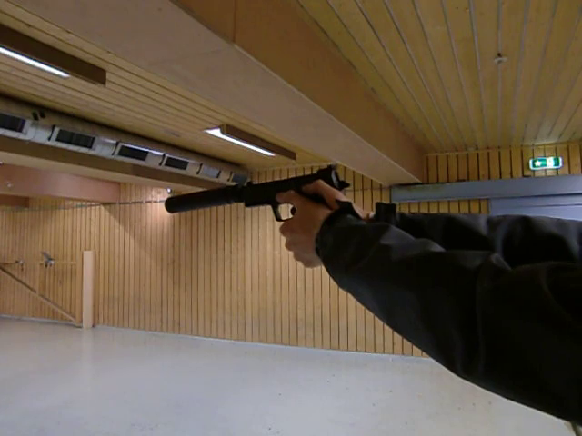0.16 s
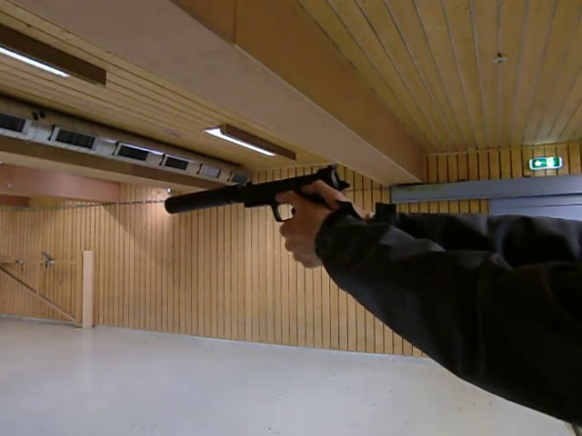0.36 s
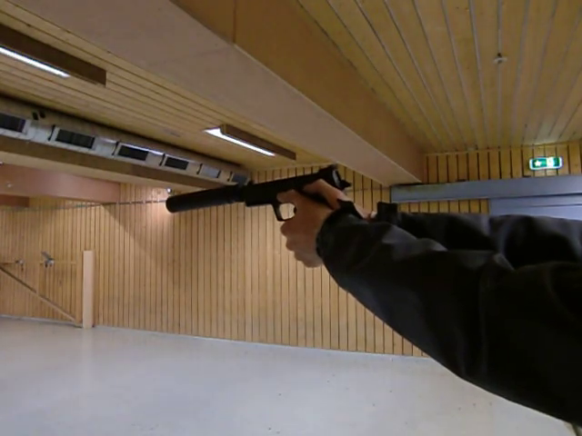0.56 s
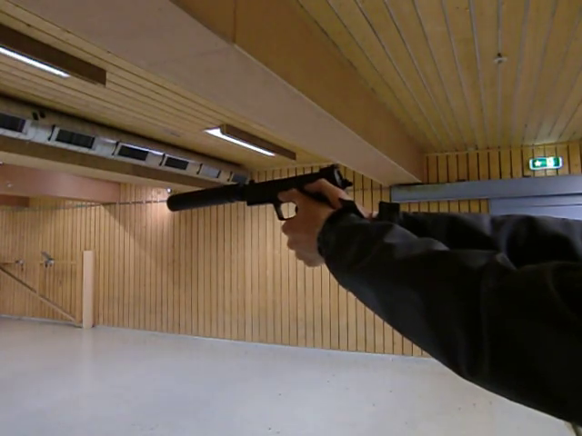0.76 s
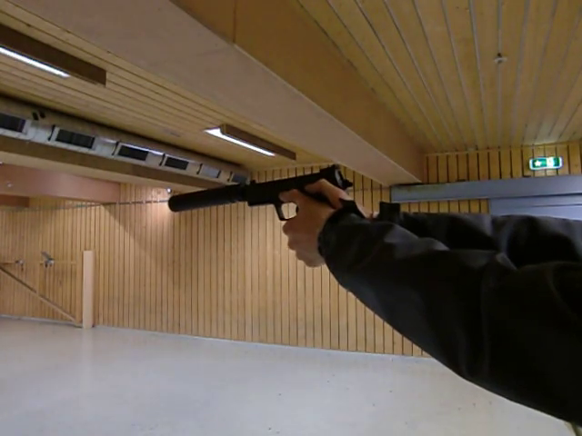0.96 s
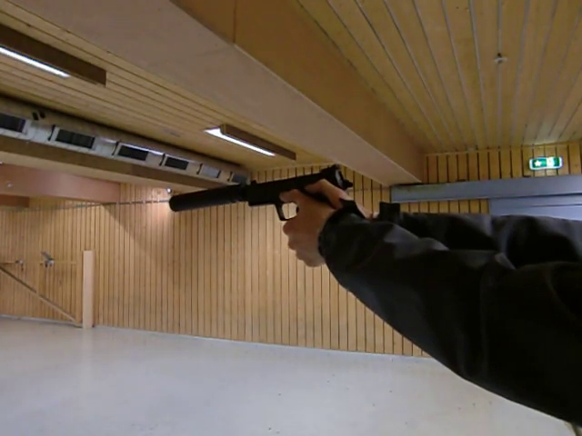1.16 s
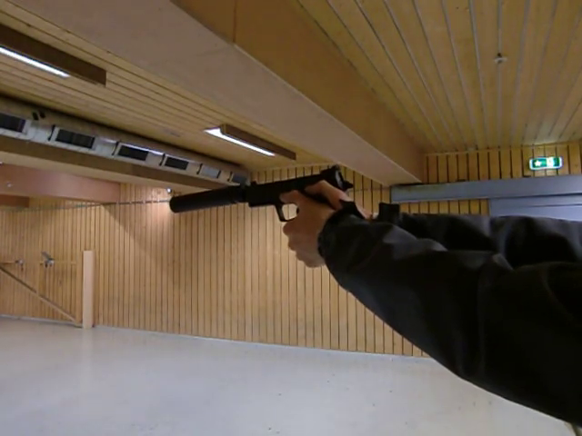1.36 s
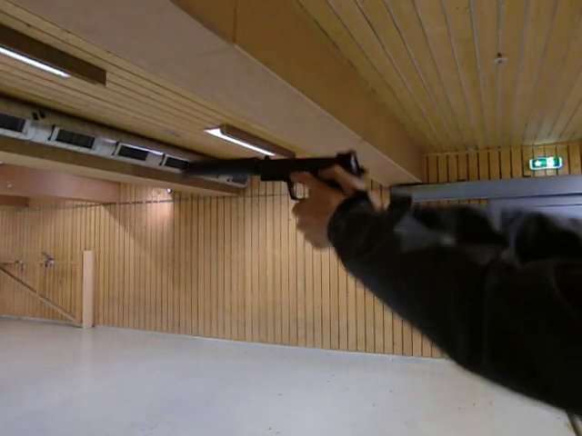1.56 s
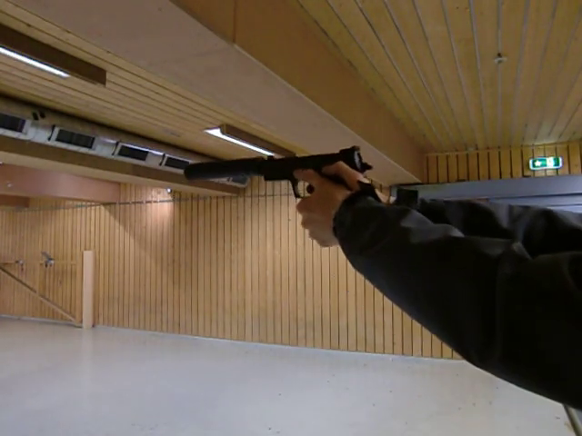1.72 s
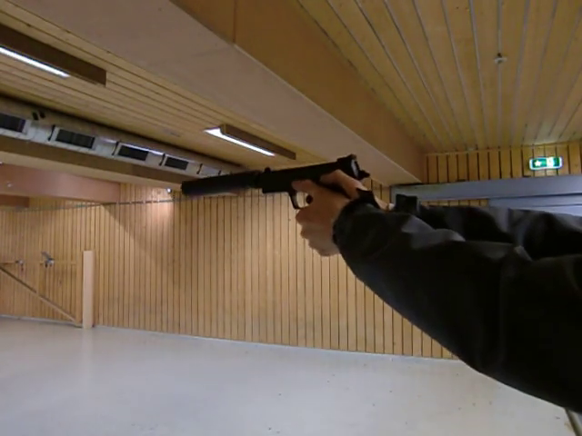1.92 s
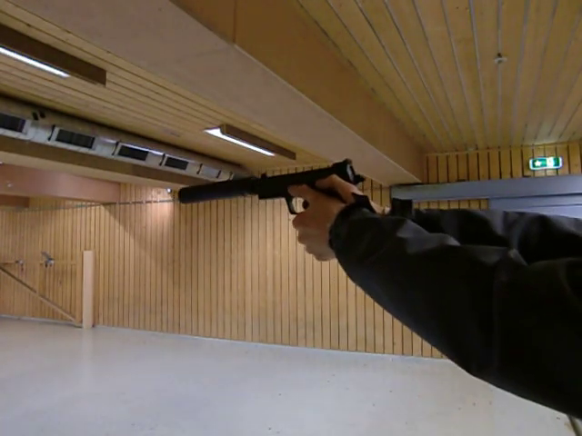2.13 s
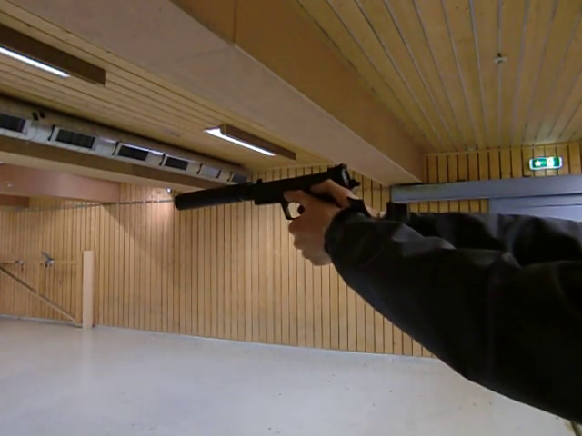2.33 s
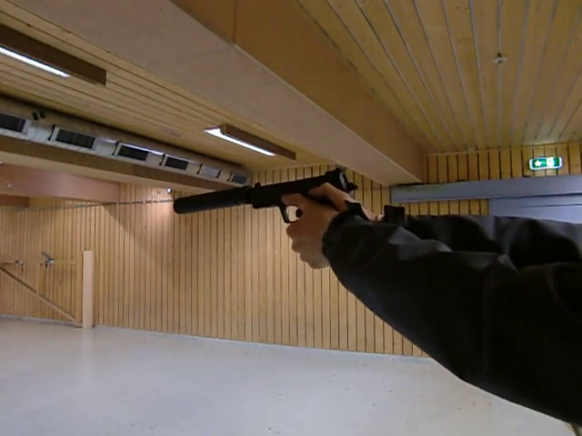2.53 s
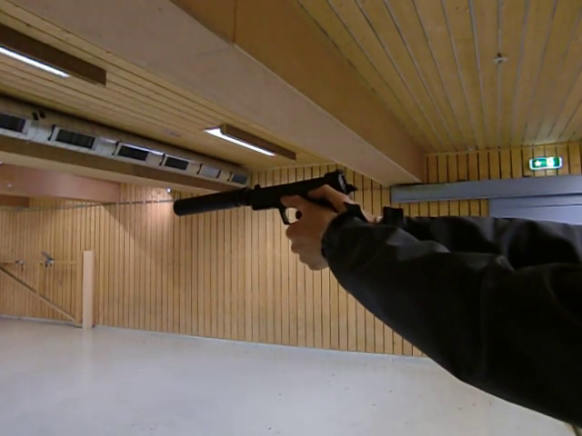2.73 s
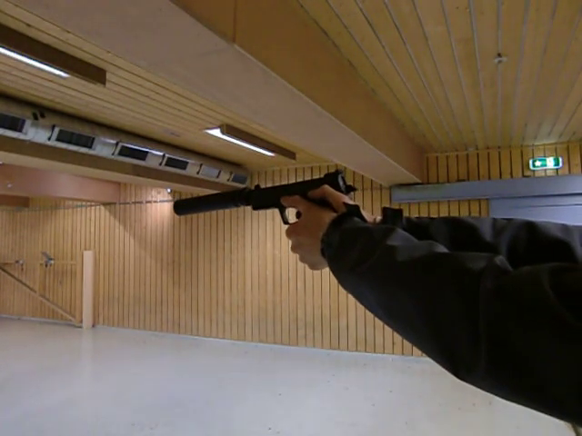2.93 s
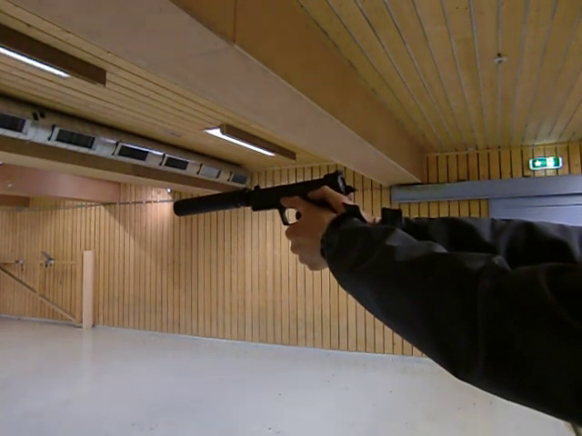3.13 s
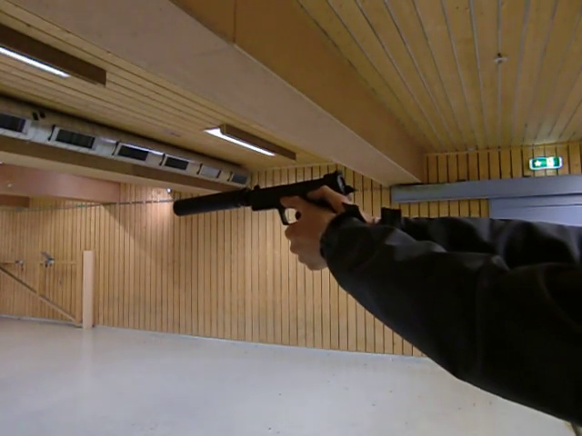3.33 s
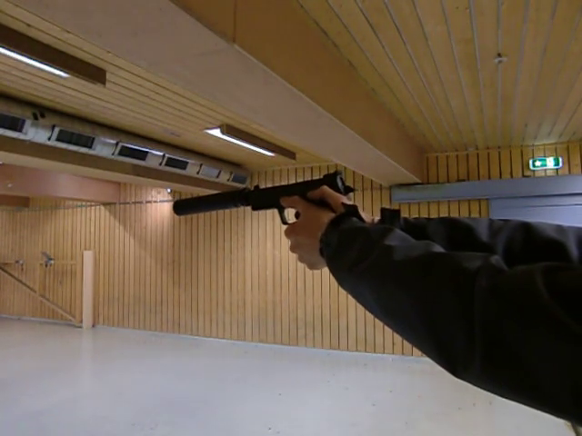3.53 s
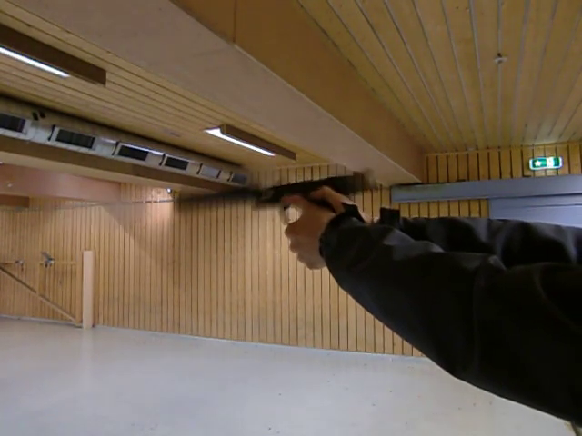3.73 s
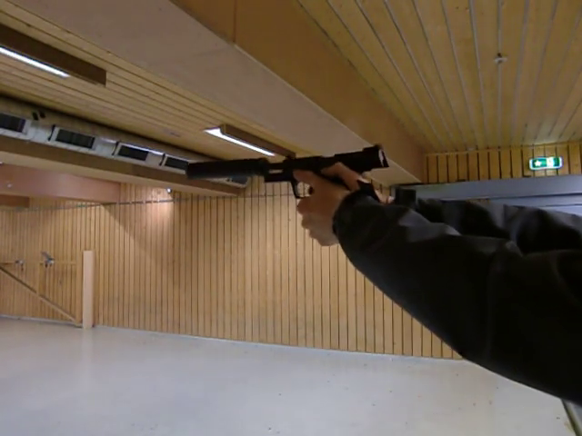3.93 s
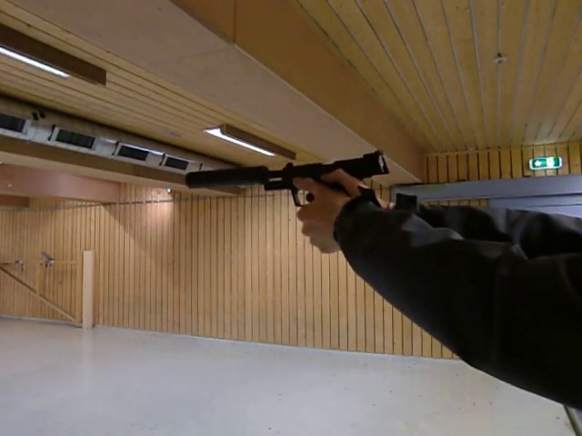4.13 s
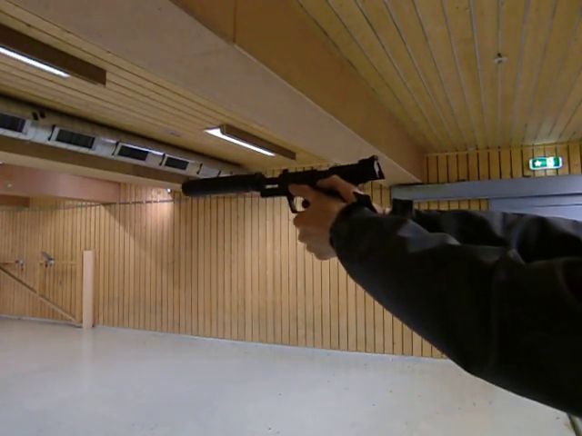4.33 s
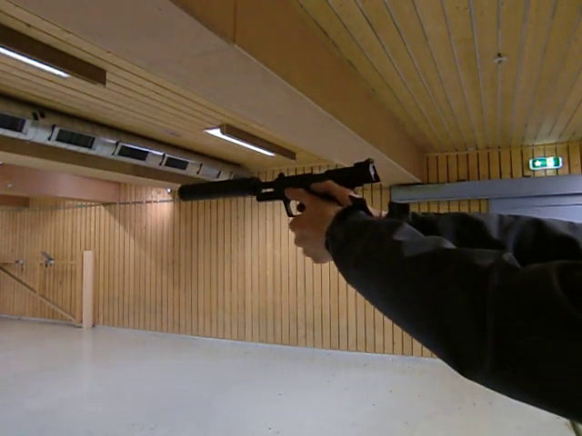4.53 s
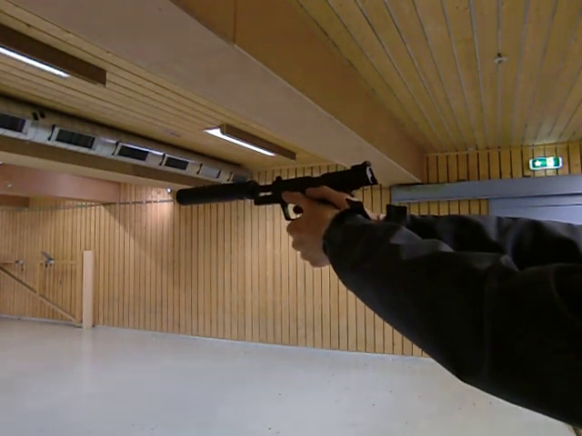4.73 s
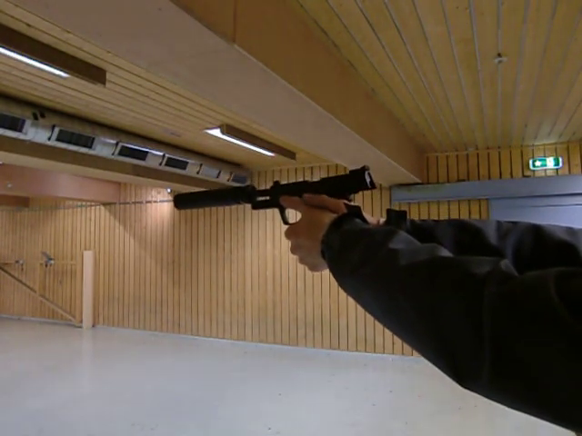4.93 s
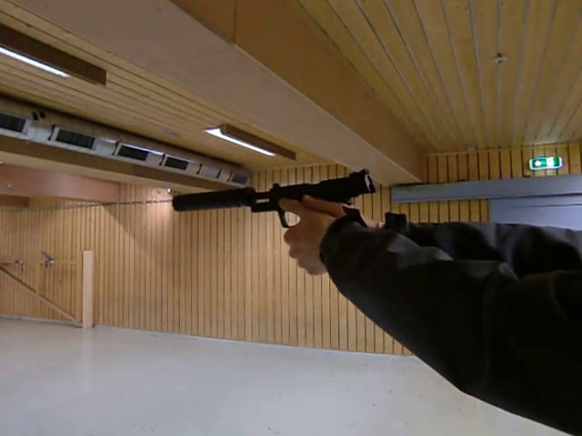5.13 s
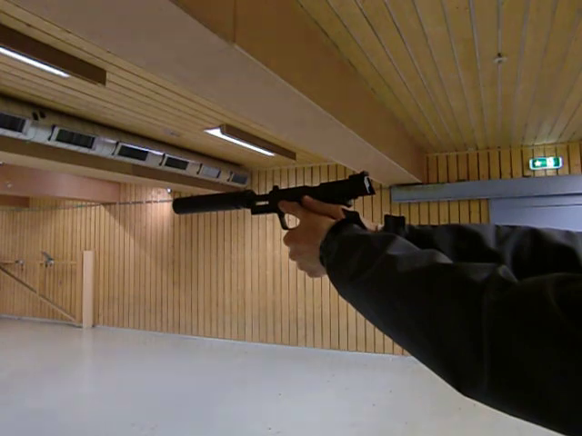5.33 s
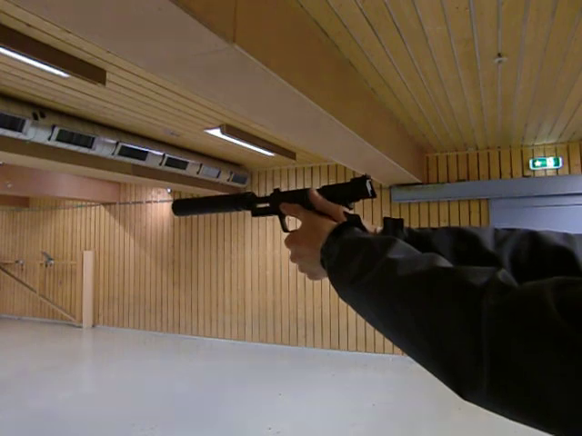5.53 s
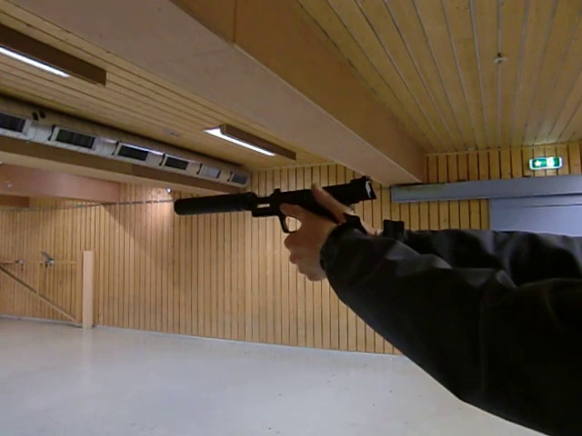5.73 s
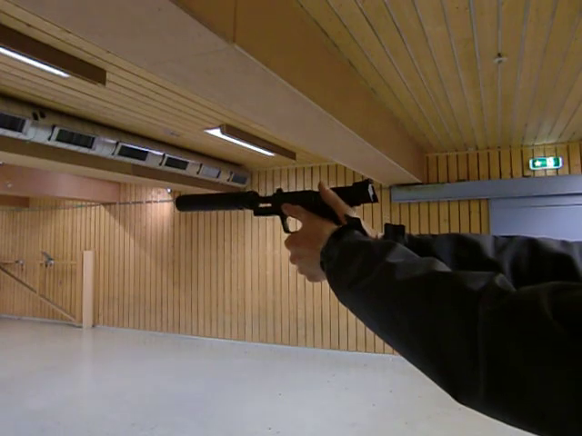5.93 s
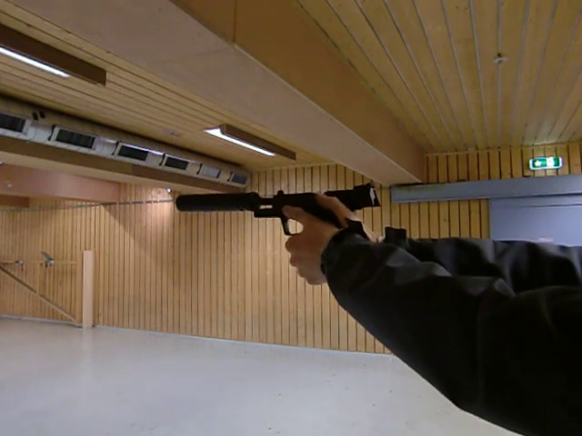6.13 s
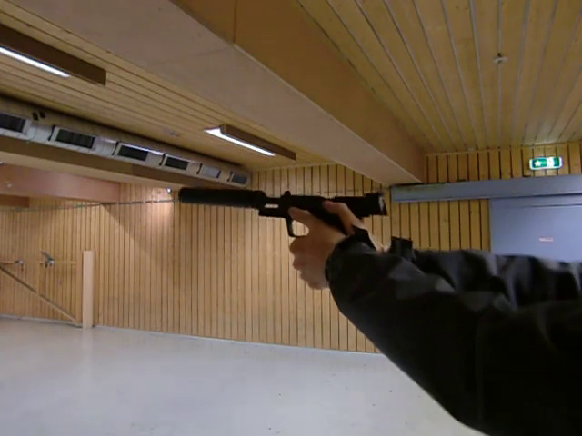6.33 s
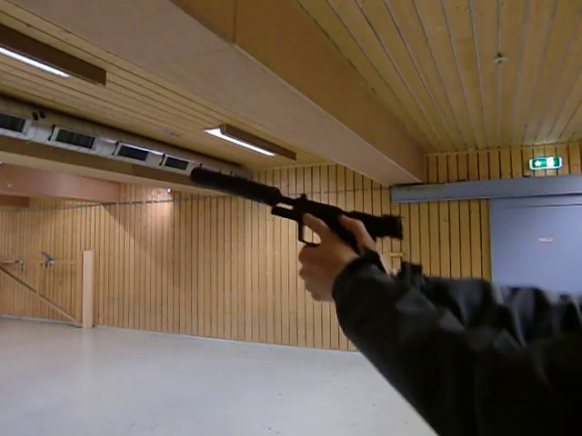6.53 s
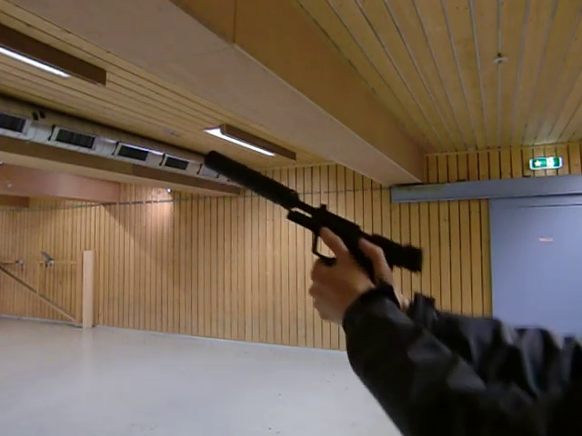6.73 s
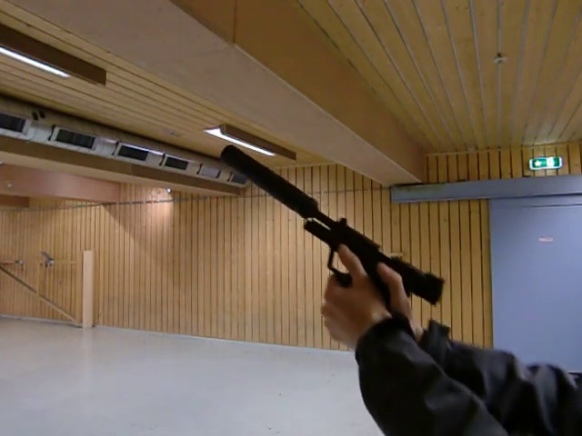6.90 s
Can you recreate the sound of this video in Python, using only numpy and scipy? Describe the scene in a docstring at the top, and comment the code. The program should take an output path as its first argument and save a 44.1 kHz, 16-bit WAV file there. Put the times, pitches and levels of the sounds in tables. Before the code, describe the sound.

Over a low ventilation rumble, a nearby suppressed pistol goes off with a hissing snap and a clack of its slide, echoing through a wood-lined hall. The spent case tinkles across the concrete floor in quickening bounces. A second shot follows, and another case bounces and rolls to rest. Among its last bounces the hammer falls with a dry click, followed by a faint brush of cloth.

```python
"""Ventilation rumbles all along in a wood-lined indoor range. At 1.5 s a suppressed pistol fires: gas
rushes out, steel parts clack and the far wall echoes, while a nearby camera turns its gain down and back
up. The spent brass case bounces and rings on the concrete floor. A second shot comes at 3.8 s; then the
first case rolls out and the second one bounces. At 5.5 s a last pull of the trigger only clicks.
Finally a sleeve rustles as the pistol is lowered, and the second case rolls to rest."""
import sys
import numpy as np
from scipy import signal
from scipy.fft import rfft, irfft, next_fast_len
from scipy.io import wavfile

SR = 44100
rng = np.random.default_rng(int(sys.argv[2]) if len(sys.argv) > 2 else 0)


def persist_wave(psi):
    """Save psi, clipped to +-1, as 16-bit WAV."""
    counts = np.round(np.clip(psi, -1, 1) * 32767).astype(np.int16)
    wavfile.write(sys.argv[1], SR, np.atleast_2d(counts).T)


N = 307048
TIME = np.arange(N) / SR
AGE = np.arange(SR // 3) / SR  # seconds since a hit

# The two shots; thump, bark and echo levels are relative to the blast.
# start_s, level_db, thump_db, bark_hz, bark_db, echo_db (before the boost in shots)
GUNSHOTS = [(1.4918, 8, -24.5, 3400, -21.5, -10), (3.7721, 7.5, -20, 3800, -17, -7)]
# Hammer, firing pin and slide flying back at every shot. The ring level is relative to its clack.
# A decay is always the time to fade by 60 dB.
# after_blast_s, level_db, pitch_hz, ring_db, decay_s
FIRING_CLACKS = [(-0.0057, -13, 2910, -2.5, 0.016), (-0.0038, -7.5, 3160, -0.5, 0.013),
                 (0.011, 9, 4010, -7.5, 0.06)]
# Trigger, closing slide and the hammer falling with no shot: start_s, level_db, pitch_hz, ring_db, decay_s
SINGLE_CLACKS = [(1.366, -41.5, 2867, 15, 0.013), (1.533, 11.5, 5580, 2, 0.018),
                 (1.542, 16, 8660, 11.5, 0.011), (1.549, 10, 3386, -9, 0.016),
                 (3.709, -39, 3020, 4.5, 0.04), (3.7438, -35.5, 2790, 6, 0.042),
                 (3.812, 11.5, 3880, 10, 0.033), (5.507, -7.5, 2160, -18, 0.0076),
                 (5.5095, -16, 2980, 1, 0.017), (5.5131, -16, 4750, -1, 0.019)]
# Cases hitting the floor; the mix depends on how the case is turned.
# start_s, tick_db, air_note_db, air_note_hz, ring_db, direct_db
CASE_BOUNCES = [(2.333, -1.5, -13.5, 5280, 3.5, 0), (2.965, -8.5, -4, 5200, -7, -5.5),
                (3.412, -18, 0, 4604, -8, -3), (3.652, -16, -27, 5030, -10, -1.5),
                (4.497, -5, 4.5, 5400, -11, 0.5), (4.93, -9.5, -19, 4920, 2.5, 3.5),
                (5.291, -15, -21.5, 4780, -5.5, -7.5), (5.451, -19.5, -10.5, 5290, -26, -2.5),
                (5.711, -20.5, -21.5, 5030, -8, -9), (5.934, -23, -26.5, 4840, -16, -1.5)]
# Cases rolling out: start_s, length_s, level_db, turns_per_s, dip_db
CASE_ROLLS = [(4.128, 0.42, -43, 10.66, 12), (5.758, 0.76, -43, 12.8, 7)]
# The notes of a case's thin brass wall: pitch_hz, level_db, decay_s
BRASS_NOTES = [(10380, 0, .04), (10470, -6, .1), (11630, -10, .06)]
# How long the hall rings, from bass to treble: frequency_hz, decay_s
HALL_DECAY = [(35, 0.96), (150, 0.12), (500, 0.5217), (1500, 0.7), (2600, 0.7458), (5000, 0.5873),
              (8000, 0.4961), (11000, 0.4155)]

# The tone of each sound, from bass to treble: frequency_hz, level_db
BLAST_TONE = [(30, -8.5), (110, -21.5), (260, -10.5), (600, -0.5), (1100, -8.5), (1700, -2.5), (2700, 0.5),
              (4200, 0), (6000, -0.5), (7500, -4), (9800, 1), (11200, -13), (12000, -26.5)]  # gas leaving the suppressor
ECHO_TONE = [(150, -20), (350, 2), (600, -1), (1100, 0), (2400, 6.5), (4000, 3.5), (6500, 0.5),
             (9500, -7.5), (11500, -17)]  # the blast back from the far wall
CLACK_TONE = [(150, -18), (700, -14), (1500, -12), (2300, -8), (3300, -2), (5600, -3), (6800, -12),
              (9800, -9), (11500, -25)]  # steel on steel
TICK_TONE = [(100, -8), (400, -3), (1500, -5.5), (4000, -4.5), (7000, 1.5), (10000, 8.5), (11000, -2),
             (12000, -27.5)]  # brass on concrete
SLEEVE_TONE = [(180, -33.5), (300, -4), (395, -13), (560, 1), (795, -5), (9240, -14.5), (11400, -25),
               (14900, -52), (22000, -120)]  # rubbing cloth
VENT_TONE = [(12, -29), (20, -3), (63, -2.5), (91, -17), (218, -20.5), (270, -17.5), (372, -21.5),
             (667, -23.5), (722, -23), (893, -28), (1260, -28), (1690, -31.5), (3650, -37), (9250, -38.5),
             (11400, -50.5), (14900, -83.5), (22000, -120)]  # the ventilation
HALL_TONE = [(35, 5), (120, -7), (300, 1), (600, -2.5), (1000, 1), (3000, 1.5), (5500, 2.5), (10000, 0)]  # the hall's reverb


def shots(echo_delay_s=0.14, echo_swell_s=0.0059, echo_boost_db=3.5):
    """Gas rushes from the suppressor with a bark and a low thump; the far wall slaps it back."""
    out = np.zeros(N)
    for start_s, level_db, thump_db, bark_hz, bark_db, echo_db in GUNSHOTS:
        bark = gain(bark_db) * ping(bark_hz, decay_s=0.004)
        thump = gain(thump_db) * ping(pitch_hz=277.7, decay_s=0.05)
        blast = burst(click(BLAST_TONE) + bark + thump, decay_s=0.13, hall_db=3.5, build_s=0.02)
        add(out, start_s, gain(level_db) * blast)
        echo = burst(click(ECHO_TONE) + bark, decay_s=0.12, hall_db=-4.5, build_s=0.0052)
        # the slatted wall returns the sound along many paths, so the echo swells in
        swell = rise(np.arange(len(echo)) / SR, echo_swell_s)
        add(out, start_s + echo_delay_s, gain(level_db + echo_db + echo_boost_db) * swell * echo)
    return out


def steel_clacks(ring_share=0.34):
    """Trigger, hammer and slide strike and ring briefly; every shot repeats the same firing clacks."""
    out = np.zeros(N)
    firing = [(shot[0] + delay_s, *clack) for shot in GUNSHOTS for delay_s, *clack in FIRING_CLACKS]
    for start_s, level_db, pitch_hz, ring_db, decay_s in firing + SINGLE_CLACKS:
        hit = click(CLACK_TONE) + gain(ring_db) * ping(pitch_hz, ring_share * decay_s)
        clack = burst(unit_energy(hit), decay_s, hall_db=-10, build_s=0.0095)
        add(out, start_s, gain(level_db) * clack)
    return out


def bouncing_cases(second_touch_s=0.0045, second_touch_db=-3):
    """A case lands on one end, then the other: it ticks, the air inside sounds and its wall rings."""
    out = np.zeros(N)
    for start_s, tick_db, air_note_db, air_note_hz, ring_db, direct_db in CASE_BOUNCES:
        tick = gain(tick_db) * click(TICK_TONE)
        air_note = gain(air_note_db) * ping(air_note_hz, decay_s=0.0049)
        ring = gain(ring_db) * brass_ring()
        paths = gain(1) * hall(build_s=0.0017)
        paths[0] += gain(direct_db)  # the sound that comes straight to the microphone
        add(paths, second_touch_s, gain([direct_db + second_touch_db]))
        add(out, start_s, signal.fftconvolve(tick + air_note + ring, paths))
    return out


def brass_ring():
    """The thin wall of a case rings, a little differently each time."""
    return sum(gain(level_db + rng.normal(0, 1)) * ping(pitch_hz + rng.normal(0, 17), decay_s)
               for pitch_hz, level_db, decay_s in BRASS_NOTES)


def rolling_cases(touches_per_s=200, loss_db=12.5, loss_curve=2.2):
    """Cases chatter over the concrete in tiny touches, swelling once a turn and dying away."""
    out = np.zeros(N)
    for start_s, length_s, level_db, turns_per_s, dip_db in CASE_ROLLS:
        touches = (rng.random(N) < touches_per_s / SR) * rng.standard_normal(N)
        one_touch = brass_ring() + gain(-18) * click(TICK_TONE) + gain(-20) * ping(5020, decay_s=0.004)
        chatter = signal.fftconvolve(touches, one_touch)
        chatter = unit_level(signal.fftconvolve(chatter, hall(build_s=0.0049))[:N])
        age_s = np.maximum(TIME - start_s, 0)
        rolled_s = np.minimum(age_s, length_s)
        lost_db = loss_db * (rolled_s / length_s) ** loss_curve  # weakens slowly at first
        turn_db = dip_db * np.cos(np.pi * turns_per_s * rolled_s) ** 2
        envelope = rise(age_s, rise_s=0.008) * fade(age_s - rolled_s, decay_s=0.32)
        out += gain(level_db - lost_db - turn_db) * envelope * chatter
    return out


def sleeve(start_s=5.66, start_db=-65, growth_db_per_s=9):
    """Cloth brushes as the arm comes down, growing steadily louder."""
    moving_s = TIME - start_s
    return (moving_s > 0) * gain(start_db + growth_db_per_s * moving_s) * noise(SLEEVE_TONE)


def ventilation(level_db=-47.5):
    """The ventilation gives a steady low rumble."""
    return gain(level_db) * noise(VENT_TONE)


def hall(build_s):
    """The hall's reverb after a click: noise that builds up, then fades at each frequency's own pace."""
    hz, seconds, bands = signal.stft(rng.standard_normal(SR + SR // 4), SR, nperseg=512)
    shape = fade(seconds, look_up(HALL_DECAY, hz)[:, None]) * gain(look_up(HALL_TONE, hz))[:, None]
    tail = signal.istft(bands * shape, SR, nperseg=512)[1]
    return unit_energy(tail * rise(np.arange(len(tail)) / SR, build_s))


def burst(pulse, decay_s, hall_db, build_s):
    """Spread a pulse into a fading puff of noise, followed by the hall's reverb."""
    puff = rng.standard_normal(len(AGE)) * fade(AGE, decay_s)
    paths = gain(hall_db) * np.linalg.norm(puff) * hall(build_s)
    add(paths, 0, puff)
    return signal.fftconvolve(pulse, paths)


def click(tone, size=2048):
    """The shortest click that has this tone."""
    cepstrum = irfft(np.log(gain(look_up(tone, np.fft.rfftfreq(size, 1 / SR)))))
    # doubling the first half and clearing the second packs the energy at the start
    cepstrum[1:size // 2] *= 2
    cepstrum[size // 2 + 1:] = 0
    pulse = irfft(np.exp(rfft(cepstrum)))
    return np.pad(unit_energy(pulse), (0, len(AGE) - size))


def ping(pitch_hz, decay_s):
    """One pure note that dies away."""
    return unit_energy(np.cos(2 * np.pi * pitch_hz * AGE) * fade(AGE, decay_s))


def noise(tone):
    """Steady noise with this tone."""
    return unit_level(filtered(rng.standard_normal(N), lambda hz: gain(look_up(tone, hz))))


def filtered(sound, response):
    """Turn each frequency up or down by response(hz)."""
    size = next_fast_len(len(sound) + SR // 4)
    return irfft(rfft(sound, size) * response(np.fft.rfftfreq(size, 1 / SR)), size)[:len(sound)]


def look_up(table, hz):
    """Read between a table's rows, with octaves evenly spaced."""
    frequencies, values = np.transpose(table)
    return np.interp(np.log(hz + 1), np.log(frequencies), values)


def gain(db):
    """Turn decibels into a multiplier."""
    return 10 ** (np.asarray(db) / 20)


def unit_level(sound):
    """Scale to an average (rms) level of 1."""
    return sound / np.sqrt(np.mean(sound ** 2) + 1e-20)


def unit_energy(sound):
    """Scale to a total energy of 1."""
    return sound / np.linalg.norm(sound)


def rise(seconds, rise_s):
    """Climb from 0 towards 1."""
    return 1 - np.exp(-seconds / rise_s)


def fade(seconds, decay_s):
    """Fall by 60 dB every decay_s."""
    return np.exp(-np.log(1000) * seconds / np.maximum(decay_s, 1e-4))


def add(track, start_s, sound):
    """Mix a sound into a track."""
    part = track[round(start_s * SR):][:len(sound)]
    part += sound[:len(part)]


def smoothed(values, lag_s):
    """Follow the values with a lag."""
    keep = np.exp(-1 / (lag_s * SR))
    return signal.lfilter([1 - keep], [1, -keep], values)


def gain_control(sound, threshold_db=-10.5, attack_s=0.01, recovery_db_per_s=66.5):
    """Loud sound pulls the gain down quickly; it climbs back at a steady rate."""
    level_db = 10 * np.log10(smoothed(sound ** 2, lag_s=0.004) + 1e-12)
    excess_db = np.maximum(level_db - threshold_db, 0)
    climb_db = recovery_db_per_s * TIME
    cut_db = np.maximum.accumulate(excess_db + climb_db) - climb_db
    return sound * gain(-smoothed(cut_db, attack_s))


def scene():
    """Everything as it reaches the microphone, in one channel."""
    return (shots() + steel_clacks() + bouncing_cases() + rolling_cases() + sleeve() + ventilation())[None]


def record(dry):
    """The camera ducks its gain, overloads as a shot begins and cuts the highest treble."""
    ceiling, top_hz = gain(-1.5), 11800
    ducked = gain_control(dry[0])
    squashed = ducked / (1 + (ducked / ceiling) ** 4) ** (1 / 4)
    return filtered(squashed, lambda hz: 1 / np.sqrt(1 + (hz / top_hz) ** 120))[None]


dry = scene()
out = record(dry)
persist_wave(out)
```